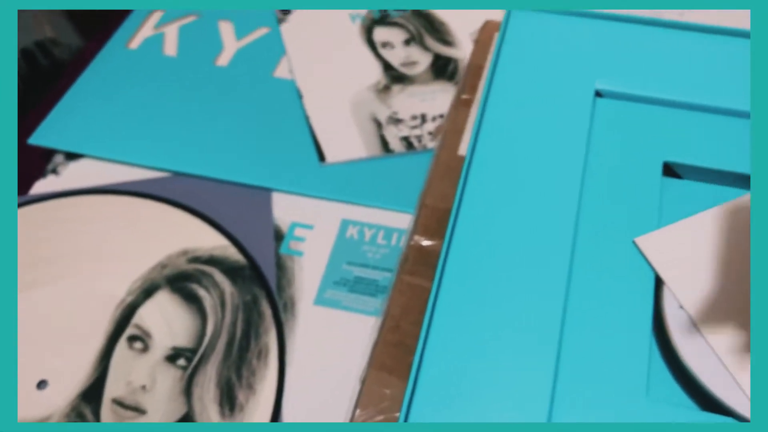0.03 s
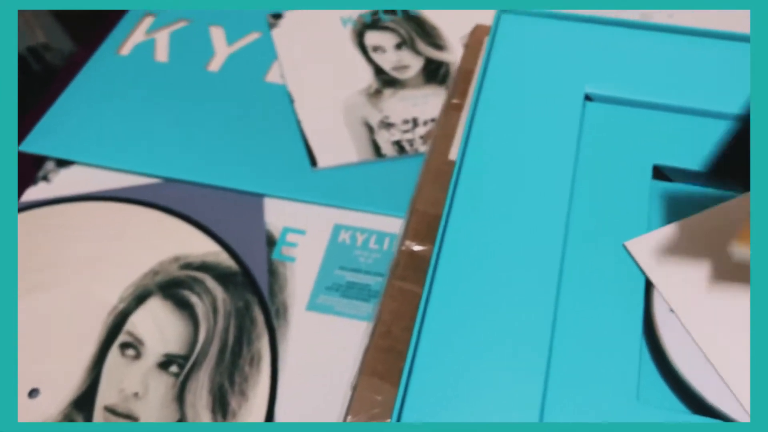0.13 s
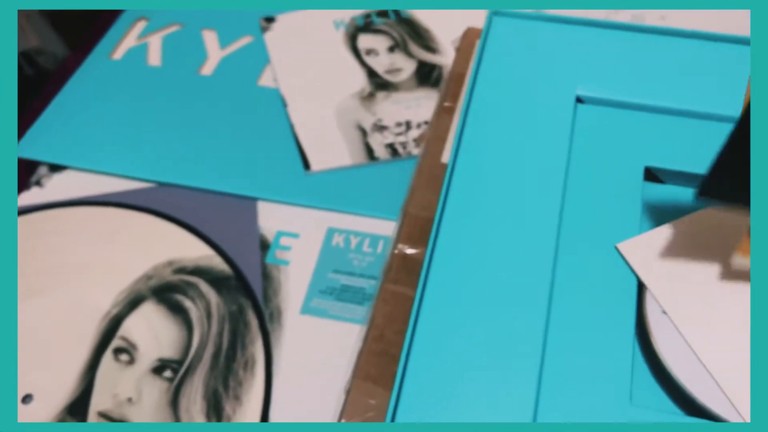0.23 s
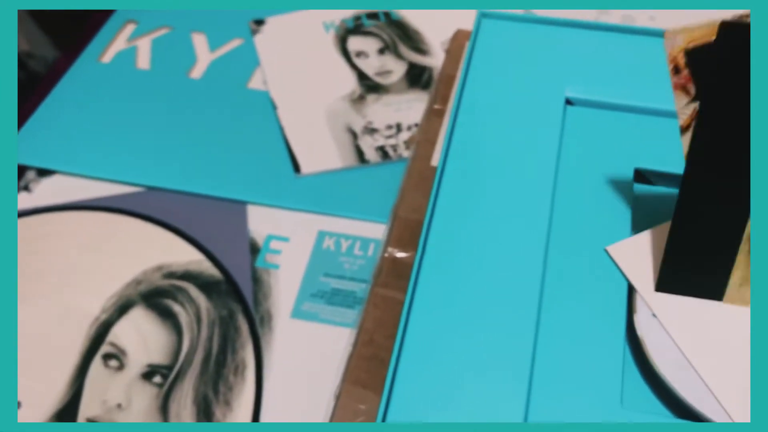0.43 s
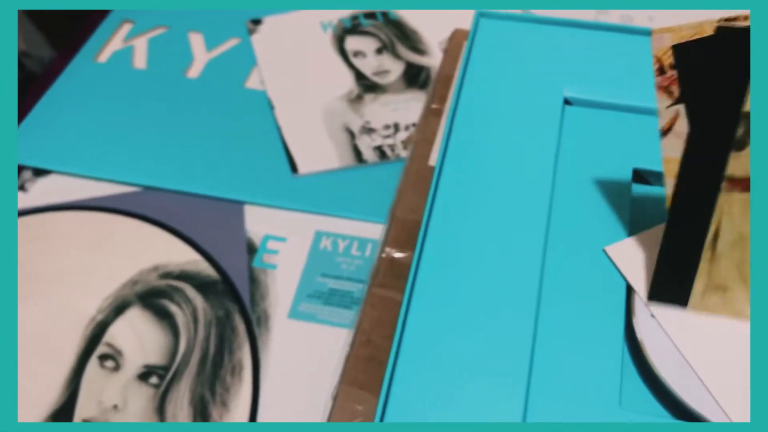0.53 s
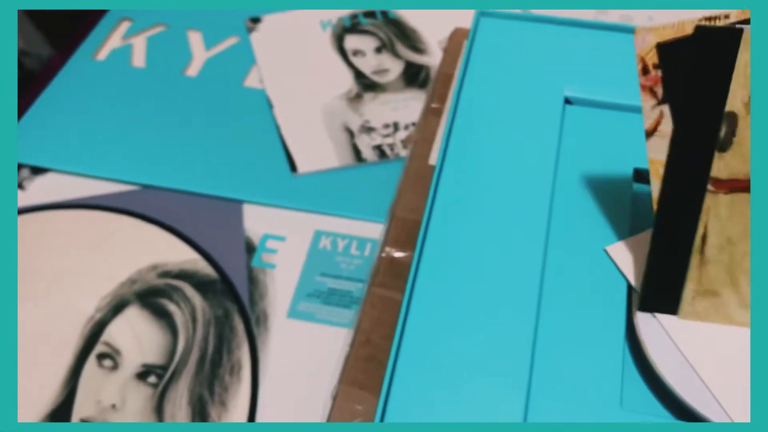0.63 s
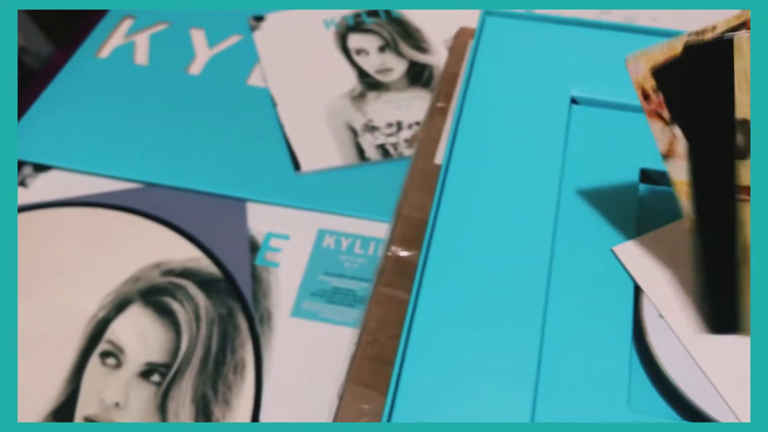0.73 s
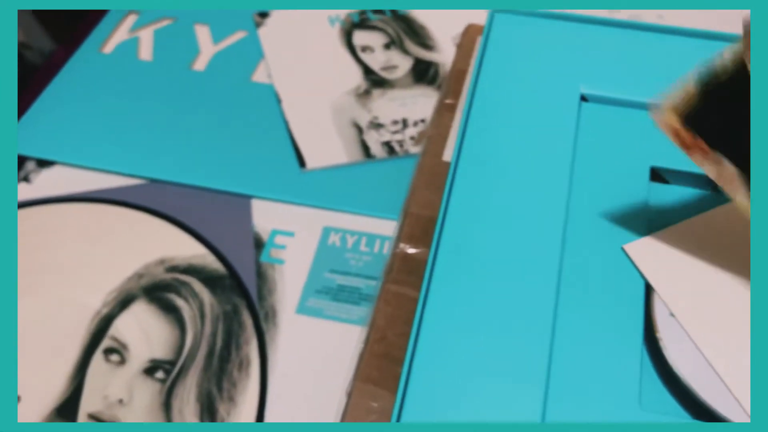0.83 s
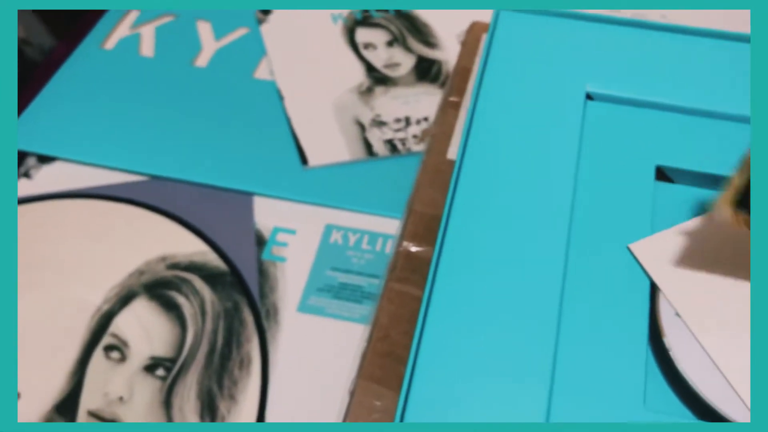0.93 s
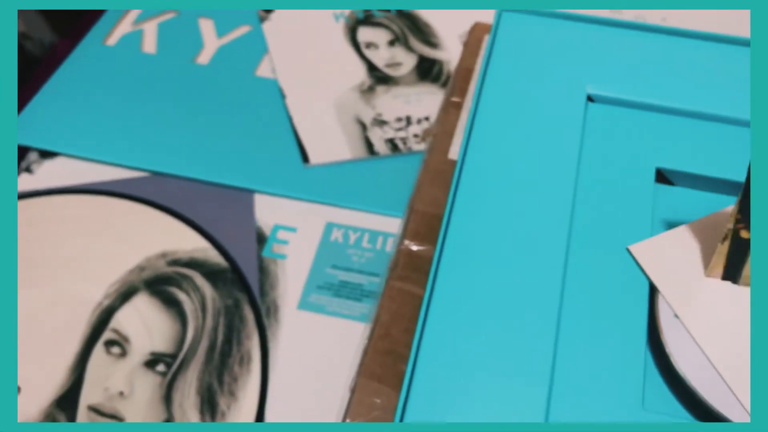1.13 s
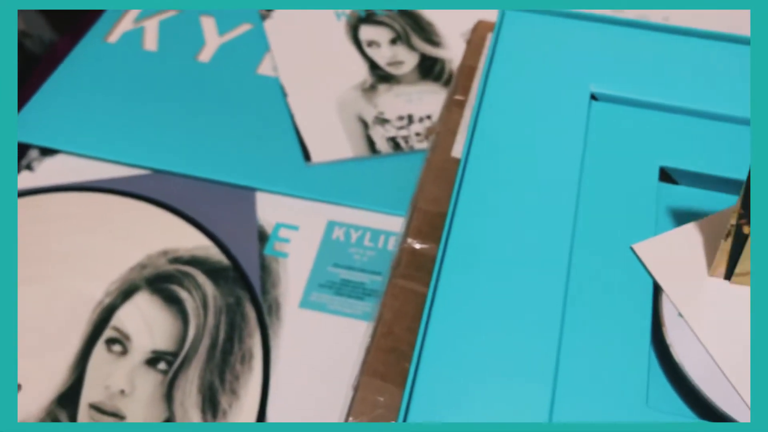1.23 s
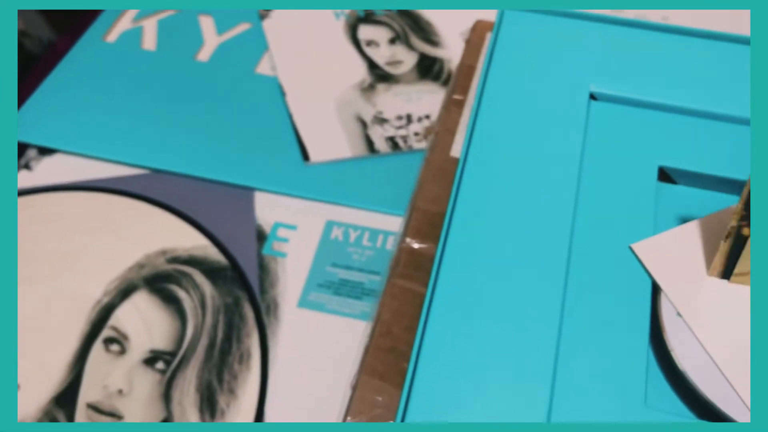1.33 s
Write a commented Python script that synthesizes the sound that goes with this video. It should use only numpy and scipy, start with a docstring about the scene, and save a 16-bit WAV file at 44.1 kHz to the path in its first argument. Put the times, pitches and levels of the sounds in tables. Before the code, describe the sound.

A card sleeve is drawn from a cardboard box, catching with sharp taps and sliding over paper. After faint rubs, it is set back with a quick run of taps, heard close up in a small quiet room.

```python
"""A card sleeve is drawn out of a cardboard box on a table: it catches, flaps free, slides over paper.
After a few faint rubs it is set back, its edge ticking down in a quick run of taps.
Each tap cracks, rings the card and thumps the box; friction is fibre slips over hiss.
The shifting box nudges the table. A small quiet room answers."""
import sys
import numpy as np
from scipy import signal
from scipy.fft import rfft, irfft, next_fast_len
from scipy.io import wavfile
from scipy.ndimage import uniform_filter1d, map_coordinates

SR = 44100
rng = np.random.default_rng(int(sys.argv[2]) if len(sys.argv) > 2 else 0)


def store_wav(level_fs):
    """Save 16-bit WAV to argv[1]."""
    pcm = np.round(np.clip(np.atleast_2d(level_fs), -1, 1) * 32767)
    wavfile.write(sys.argv[1], SR, pcm.T.astype(np.int16))


N = 61739

# short rubs: t/s, rise/s, length/s, fall/s, level/dB, tilt/(dB/oct)
RUB_STROKES = [(.001, 0.0018, 0.008, 0.011, -51.5, -1), (0.514, .01, 0.015, .003, -56.5, 3),
               (0.637, 0.0029, 0.042, .002, -58, -0.5), (0.728, 0.019, 0.082, .015, -64, -0.7),
               (0.7538, 0.0034, 0.0061, 0.0029, -44, 1.5), (0.898, 0.043, .055, .004, -62, 1),
               (.958, 0.0055, 0.036, 0.0037, -43.5, 0.8), (0.987, 0.0041, 0.018, 0.0069, -38, -1.5),
               (1.007, .004, 0.0507, 0.0026, -44.5, -3.7), (1.041, 0.0036, .005, 0.0064, -39.5, -10.5),
               (1.07, 0.0058, 0.016, 0.015, -40, -6.4), (1.171, 0.027, 0.1, 0.011, -59, 0),
               (1.299, 0.0084, 0.083, .01, -63.5, -2), (1.33, 0.011, 0.0098, 0.0039, -58.5, 0.5)]
# paper friction: f/Hz, level/dB
FRICTION_SPECTRUM = [(20, -27.5), (80, -17.5), (300, -8.5), (650, -8), (1050, 1.5), (1900, -4),
                     (2800, -2.5), (4500, -7), (6200, -11), (8000, -6), (10500, -12.5), (13500, -5.5),
                     (16000, -11)]
# card contacts: t/s, crack level/dB, crack t60/s, crack tilt/(dB/oct), crack cut-off/Hz,
# panel level/dB, edge level/dB, box level/dB
CONTACTS = [(.002, -53.5, .03, 6, 8840, -76, -79, -48.5), (0.0486, -46.5, 0.006, 2, 11060, -51, -65, -107),
            (0.163, -44.5, 0.0207, -4, 11830, -42, -50, -45.5),
            (.193, -35.5, 0.0095, 0.5, 7000, -33, -60, -43),
            (0.2224, -25.5, 0.042, -3, 12160, -51, -46, -33.5),
            (.226, -29.5, 0.015, 1, 16100, -45, -46.5, -59),
            (0.2277, -38, .012, 2, 7760, -22, -46.5, -30.5),
            (0.2338, -25, 0.0053, 1.5, 7560, -26.5, -31, -65),
            (0.2372, -18.5, 0.013, 0.5, 15870, -15.5, -36, -27.5),
            (0.2501, -27.5, 0.05, -.5, 9120, -29.5, -24, -33.5),
            (.262, -34, 0.01, 2.5, 14000, -25, -51, -34), (0.293, -38.5, .022, -11, 9020, -44, -38.5, -42),
            (0.6393, -51, 0.03, 3.5, 11900, -87, -54, -60),
            (.7315, -56.5, .012, 9.5, 15150, -72, -83, -58.5),
            (0.9561, -40, 0.0059, 4, 4150, -50, -41, -45), (0.9723, -25.5, 0.019, -2, 9460, -38, -28, -52),
            (0.9821, -26.5, 0.013, -1, 5930, -39, -52, -40), (0.9871, -29, .03, -8.5, 12050, -51, -58, -34),
            (1.0131, -30, 0.013, 1, 9040, -30.5, -46, -39.5),
            (1.0371, -28.5, 0.0065, 0.5, 14000, -59, -33, -32.5),
            (1.0637, -29.5, 0.021, 0, 13200, -34, -27, -54),
            (1.08, -26.5, 0.0065, 1, 12900, -28.5, -42, -43),
            (1.2713, -41, 0.016, 2.5, 3330, -57, -45.5, -61)]
# contact crack: f/Hz, level/dB
CRACK_SPECTRUM = [(20, -32), (70, -10), (400, -13.5), (750, -0.5), (1200, 4), (2000, -0.5), (3000, -3),
                  (4200, -3.5), (6000, -15), (8500, -14.5), (11000, -21.5), (16000, -15)]
# modes of card panel, card edge, box, table: f/Hz, relative level/dB, t60/s
PANEL_MODES = [(910, -9.5, 0.054), (981, 11, 0.02), (1114, -2.5, .021), (1433, -8, 0.041)]
EDGE_MODES = [(2117, -0.5, 0.018), (2590, -14.5, 0.017), (2692, 6, 0.015), (3160, -7, 0.022)]
BOX_MODES = [(71.5, -11.5, 0.11), (169.3, -10, 0.071), (245.6, -6, 0.065), (309, 2, 0.059),
             (597, 4.5, 0.045)]
TABLE_MODES = [(60.6, -5.5, 0.14), (84.4, -5, 0.11), (125, -12, 0.046), (161.4, -1.5, 0.061)]
# table bumps: t/s, level/dB
TABLE_BUMPS = [(0.069, -52.5), (0.232, -45), (.3, -58), (.42, -54), (.45, -64), (0.553, -60), (0.734, -53),
               (0.973, -51), (1.347, -64.5)]
# long slide: t/s, level/dB, brightness (dullest at -2, brightest at 2)
SLIDE_PATH = [(0.157, -63, 2), (0.169, -50.5, 3), (.2, -44.5, -3), (.222, -44, 0), (.28, -44, -3.5),
              (.325, -41, .5), (.36, -46, -1), (.405, -43, 0.5), (0.441, -39.5, 1), (0.456, -46, -1),
              (.485, -42, 1), (.503, -53, -3.5), (.55, -57.5, 1), (0.586, -57, 2), (.62, -92.5, 7)]
# scraped card resonances: f/Hz, width/Hz, level/dB re plain friction
SCRAPE_BANDS = [(2650, 150, -6.5), (3090, 110, -7.5), (4700, 1000, -1.5)]
# edge drags: t/s, rise/s, length/s, fall/s, level/dB
EDGE_DRAGS = [(.245, 0.0034, 0.01, 0.064, -38.5), (0.294, .01, 0.021, .01, -57),
              (1.076, 0.0068, 0.0088, 0.0036, -41), (1.186, 0.018, 0.066, .012, -56.5)]
# room decay: f/Hz, t60/s
ROOM_DECAY = [(100, 0.15), (1000, 0.24), (3000, 0.27), (12000, 0.27)]
# steady room noise: f/Hz, level/dB
ROOM_SPECTRUM = [(20, -2.5), (40, -2), (65, 0), (170, 0.5), (300, -2), (450, -12.5), (1000, -10.5),
                 (2800, -18), (6000, -24.5), (16000, -30.5)]


def amp(db):
    """Decibels to gain."""
    return 10 ** (np.asarray(db) / 20)


def unit(x):
    """Scale to rms 1."""
    return x / np.sqrt(np.mean(x ** 2) + 1e-20)


def along(points, hz):
    """Interpolate (f/Hz, value) points over log f."""
    f, v = np.transpose(points)
    return np.interp(np.log(hz + 1), np.log(f + 1), v)


def coloured(x, spectrum, tilt_db_oct=0):
    """Minimum-phase filter from a spectrum, tilted above the bass."""
    m = 2 * next_fast_len(len(x))
    hz = np.fft.rfftfreq(m, 1 / SR)
    gain_db = along(spectrum, hz) + tilt_db_oct * np.log2(1 + hz / 500)
    cepstrum = irfft(np.log(amp(gain_db)))
    cepstrum[1:m // 2] *= 2
    cepstrum[m // 2 + 1:] = 0
    return irfft(rfft(x, m) * np.exp(rfft(cepstrum)), m)[:len(x)]


def stroke(start_s, rise_s, length_s, fall_s):
    """Rub envelope: rise, hold, fall."""
    t = np.arange(N) / SR - start_s
    return np.clip(t / rise_s, 0, 1) * np.exp(-np.maximum(t - length_s, 0) / fall_s)


def fibres(slips_per_s=2500, slip_share=0.4, judder_db=1.5, judder_per_s=260):
    """Paper fibres slip over a smooth hiss, juddering with the hand."""
    slips = unit(rng.standard_normal(N) * (rng.random(N) < slips_per_s / SR))
    judder = map_coordinates(rng.standard_normal(N // 16), [np.arange(N) * judder_per_s / SR])
    hiss = rng.standard_normal(N)
    return (np.sqrt(slip_share) * slips + np.sqrt(1 - slip_share) * hiss) * amp(judder_db * judder)


def rubs():
    """Card brushes briefly on card."""
    return sum(amp(db) * stroke(*timing) * unit(coloured(fibres(), FRICTION_SPECTRUM, tilt))
               for *timing, db, tilt in RUB_STROKES)


def blow(x):
    """Scale to the energy of 5 ms at rms 1."""
    return x * np.sqrt(.005 * SR / (np.sum(x ** 2) + 1e-20))


def ring(modes, t, rise_s=0.00029, scatter_rad=0.67):
    """Damped modes; level and phase vary per blow."""
    x = np.zeros(len(t))
    for hz, db, t60 in modes:
        decay = amp(db + rng.normal(0, 1) - 60 * t / t60)
        x += decay * np.cos(2 * np.pi * hz * t + scatter_rad * rng.normal())
    return blow(x * (1 - np.exp(-t / rise_s)))


def taps(rise_s=0.0002, treble_db=-13):
    """Each contact cracks, rings panel and edge, thumps the box; soft ones have less treble."""
    out, t = np.zeros(N + SR), np.arange(SR // 6) / SR
    for start_s, crack_db, t60, tilt, cut_hz, panel_db, edge_db, box_db in CONTACTS:
        crush = rng.standard_normal(len(t)) * amp(-60 * t / t60) * (1 - np.exp(-t / rise_s))
        softness = [(cut_hz, 0), (cut_hz * 1.13, treble_db)]
        crack = amp(crack_db) * blow(coloured(coloured(crush, CRACK_SPECTRUM, tilt), softness))
        panel = amp(panel_db) * ring(PANEL_MODES, t)
        edge = amp(edge_db) * ring(EDGE_MODES, t)
        thump = amp(box_db) * ring(BOX_MODES, t)
        out[round(start_s * SR):][:len(t)] += crack + panel + edge + thump
    return out[:N]


def bumps(rise_s=.008):
    """The shifting box nudges the table top."""
    out, t = np.zeros(N + SR), np.arange(SR // 4) / SR
    for start_s, db in TABLE_BUMPS:
        bump = blow(ring(TABLE_MODES, t) * (1 - np.exp(-t / rise_s)))
        out[round(start_s * SR):][:len(t)] += amp(db) * bump
    return out[:N]


def patchy(x, depth_db=2):
    """Brief resonances come and go as the contact point moves."""
    z = signal.stft(x, nperseg=512)[2]
    patches = uniform_filter1d(rng.standard_normal(z.shape), size=5, axis=0)
    patches = uniform_filter1d(patches, size=7, axis=1)
    return signal.istft(z * amp(depth_db * unit(patches)), nperseg=512)[1][:N]


def scraped(grit, tilt_db_oct):
    """Fibre slips heard through the card's resonances."""
    friction = coloured(grit, FRICTION_SPECTRUM, tilt_db_oct)
    resonances = sum(amp(db) * signal.lfilter(*signal.iirpeak(hz, hz / width_hz, SR), friction)
                     for hz, width_hz, db in SCRAPE_BANDS)
    return unit(friction + resonances)


def slide():
    """The sleeve slides over paper, now duller, now brighter."""
    times_s, db, brightness = np.transpose(SLIDE_PATH)
    t = np.arange(N) / SR
    grit = patchy(fibres())
    dull, bright = scraped(grit, tilt_db_oct=-2.3), scraped(grit, tilt_db_oct=1.1)
    mix = np.interp(np.interp(t, times_s, brightness), [-2, 2], [0, 1])
    envelope = amp(np.interp(t, times_s, db, left=-120, right=-120))
    return envelope * ((1 - mix) * dull + mix * bright)


def edge_rasp(hz=2730, width_hz=500):
    """The dragged edge rasps in a narrow band."""
    rasp = unit(signal.lfilter(*signal.iirpeak(hz, hz / width_hz, SR), fibres()))
    return rasp * sum(amp(db) * stroke(*timing) for *timing, db in EDGE_DRAGS)


def room(x, walls_db=-17, walls_t60_s=0.14, tail_db=-17.5, delay_s=0.0026):
    """Quick reflections from table and box, plus a short tail."""
    hz, frames_s, z = signal.stft(rng.standard_normal(SR // 2), SR, nperseg=256)
    decay = amp(-60 * frames_s / along(ROOM_DECAY, hz)[:, None])
    tail = signal.istft(z * decay, SR, nperseg=256)[1]
    t = np.arange(len(tail)) / SR
    tail *= t > delay_s
    walls = rng.standard_normal(len(t)) * amp(-60 * t / walls_t60_s) * (t > delay_s)
    response = amp(tail_db) * tail / np.linalg.norm(tail) + amp(walls_db) * walls / np.linalg.norm(walls)
    return signal.fftconvolve(x, response)[:N]


def scene(floor_db=-63):
    """Card, reflections and table bumps over faint room noise; mono."""
    card = taps() + slide() + rubs() + edge_rasp()
    mix = card + room(card) + bumps()
    room_tone = amp(floor_db) * unit(coloured(rng.standard_normal(N), ROOM_SPECTRUM))
    return (mix + room_tone)[None]


def record(dry, low_hz=43, top_hz=15850):
    """Bass roll-off and steep treble limit."""
    m = next_fast_len(N + SR // 4)
    highpassed = signal.lfilter(*signal.butter(2, low_hz, "high", fs=SR), dry)
    lowpass = 1 / (1 + (np.fft.rfftfreq(m, 1 / SR) / top_hz) ** 160)
    return irfft(rfft(highpassed, m) * lowpass, m)[:, :N]


dry = scene()
out = record(dry)
store_wav(out)
```